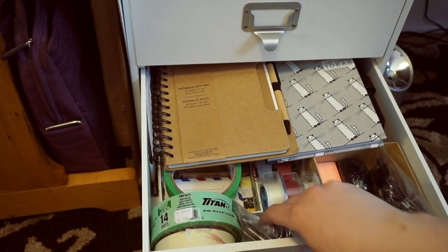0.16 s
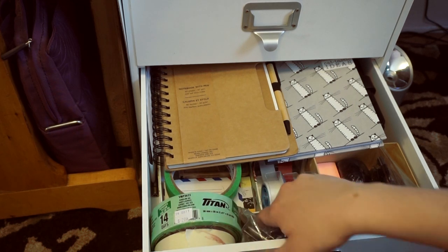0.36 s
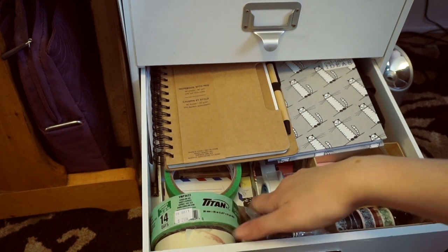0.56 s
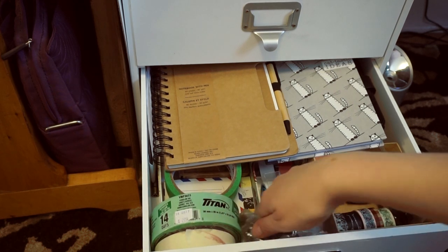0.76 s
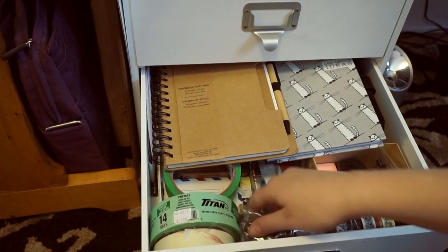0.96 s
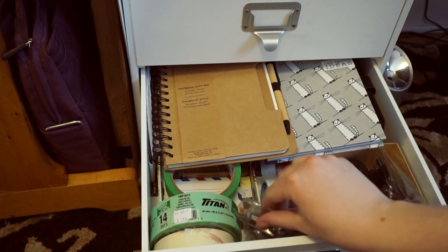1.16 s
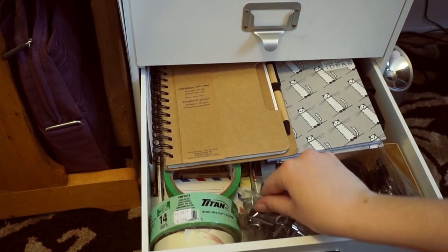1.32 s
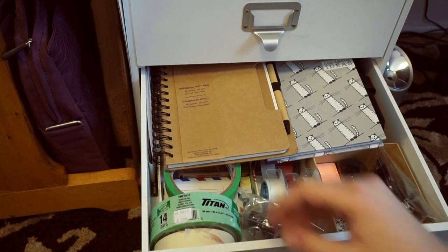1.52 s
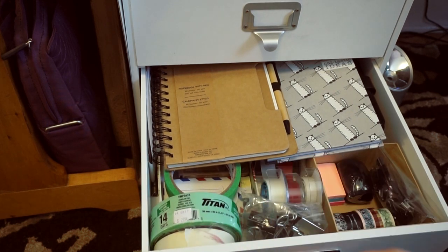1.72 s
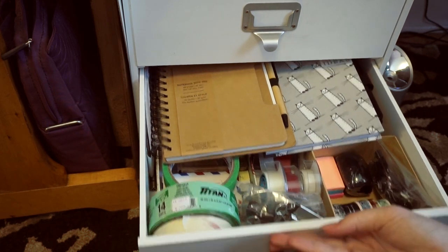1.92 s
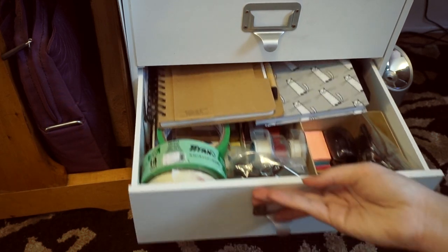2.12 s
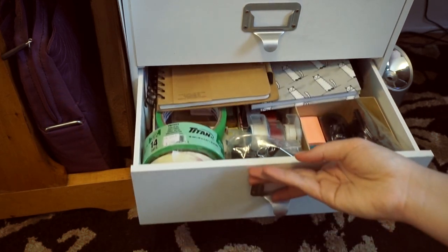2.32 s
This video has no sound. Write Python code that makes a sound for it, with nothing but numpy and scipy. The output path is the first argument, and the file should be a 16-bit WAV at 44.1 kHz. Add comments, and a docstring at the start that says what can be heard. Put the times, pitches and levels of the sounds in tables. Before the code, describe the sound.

Plastic wrapping crinkles and small items click in a drawer, which then rolls in and bumps.

```python
"""Stiff plastic wrapping snaps and crinkles as a hand rummages in an open desk drawer, close by in a
small room. Tape rolls and small boxes knock and rub against each other. Then the hand pushes the drawer
front: the drawer rolls on its runners, groans briefly and bumps, and its panels boom.
A faint, low background noise lies under it all."""
import sys
import numpy as np
from scipy import signal
from scipy.fft import rfft, irfft
from scipy.io import wavfile
from scipy.ndimage import uniform_filter1d

SR = 44100
rng = np.random.default_rng(int(sys.argv[2]) if len(sys.argv) > 2 else 0)


def dump_mix(stems):
    """Bounce the given channels to the path in sys.argv[1] as a 16-bit WAV at rate SR."""
    frames = np.atleast_2d(stems).T  # one column per channel
    limited = np.clip(frames, -1, 1)  # hard clip at full scale
    pcm = np.round(limited * 32767).astype(np.int16)
    wavfile.write(sys.argv[1], SR, pcm)


N = 104958

# how strong each pitch is in the drawer's deep rumble: pitch_hz, level_db
RUMBLE_TONE = [(30, -40), (75, -18), (105, -1.5), (180, 3), (250, -3.5), (340, 2.5), (450, -4.5),
               (700, -12), (1500, -63)]


def snaps():
    """Plastic snaps and hard things click: each is a short ring, a crack and a bright edge."""
    # one row per snap: start_s, level_db, pitch_hz, treble_db
    events = [(0.0046, -32, 1000, -63), (0.0213, -26.5, 1020, -33), (0.0476, -41, 2900, -52),
              (0.0618, -32.5, 2880, -53), (0.0715, -22.5, 4830, -31.5), (0.1552, -29.5, 4100, -29.5),
              (0.1665, -36.5, 2480, -42), (0.23, -35.5, 920, -70), (0.2444, -36, 5900, -40.5),
              (0.2599, -31.5, 2230, -45), (0.3017, -28, 1130, -39), (0.3118, -31, 4300, -35),
              (0.315, -29, 5440, -27), (0.34, -42, 3920, -27), (0.3471, -29.5, 1780, -34),
              (0.3747, -32.5, 1150, -36), (0.3981, -26.5, 4550, -29.5), (0.4105, -29.5, 2530, -28),
              (0.4374, -35.5, 2270, -37), (0.4487, -33, 2490, -35), (0.4655, -27.5, 2450, -43),
              (0.4819, -24, 2300, -57), (0.5158, -26, 3650, -37.5), (0.5854, -33, 1930, -52),
              (0.5979, -25, 3790, -34), (0.616, -28.5, 2200, -37), (0.6306, -25, 2940, -28),
              (0.7343, -35, 4800, -37), (0.7423, -32.5, 2800, -27.5), (0.7483, -29, 2300, -46),
              (0.7597, -37, 1600, -35), (0.7849, -27, 3280, -26), (0.7955, -42, 3240, -45),
              (0.8378, -34.5, 2340, -40.5), (0.8572, -30, 2320, -50), (0.8659, -30.5, 5500, -33.5),
              (0.8815, -26, 1110, -31.5), (0.9078, -24.5, 3270, -27.5), (0.924, -34.5, 2420, -33.5),
              (0.9389, -29, 1340, -37.5), (1.011, -41, 2010, -56), (1.0196, -35, 1990, -43),
              (1.0251, -31.5, 3300, -33.5), (1.0733, -35, 2240, -60), (1.0774, -29.5, 2370, -39.5),
              (1.1, -39, 6400, -34.5), (1.1118, -29.5, 2950, -34), (1.121, -28.5, 6150, -34.5),
              (1.171, -33, 4670, -38), (1.1892, -21, 3070, -27.5), (1.1922, -28, 3540, -32),
              (1.211, -38.5, 3240, -34), (1.236, -31, 2760, -35), (1.2842, -30, 4750, -29.5),
              (1.2911, -25.5, 1320, -29), (1.3154, -26.5, 3420, -47), (1.3195, -28, 3300, -41),
              (1.326, -29.5, 1800, -35), (1.3543, -39.5, 1740, -37.5), (1.3659, -32.5, 4970, -42),
              (1.3885, -41, 1330, -39), (1.411, -32, 890, -31.5), (1.4422, -26, 2450, -35.5),
              (1.4612, -27.5, 1350, -30), (1.478, -36, 2900, -38), (1.5007, -36, 2700, -49),
              (1.5087, -37, 1290, -61), (1.58, -32.5, 3800, -35.5), (1.627, -44.5, 2234, -52.5),
              (1.83, -55.5, 1006, -66), (1.8557, -50, 940, -59), (1.8872, -51.5, 2340, -63),
              (2.049, -34, 3500, -51.5)]
    # tone of the crack: pitch_hz, level_db
    crack_tone = [(150, -29.5), (400, -19.5), (1200, 0.5), (3000, 2.5), (4600, 3.5), (6000, -4.5),
                  (7500, -5), (12000, -60)]
    # tone of the bright edge: pitch_hz, level_db
    edge_tone = [(3000, -26), (6500, 4), (9000, 1.5), (14000, -1.5), (16000, -14)]
    out, t = np.zeros(N), np.arange(SR // 20) / SR
    rise_s, ring_share = 0.00081, 0.39
    rise = np.minimum(t / rise_s, 1)
    for start_s, level_db, pitch_hz, treble_db in events:
        note = unit(rise * ring(t, pitch_hz, cycles=16.6))
        crack = unit(rise * burst(t, crack_tone, fade_s=0.019))
        body = unit(np.sqrt(ring_share) * note + np.sqrt(1 - ring_share) * crack, size=176)
        edge = unit(rise * burst(t, edge_tone, fade_s=0.015), size=176)
        add(out, start_s, gain(level_db) * body + gain(treble_db) * edge)
    return out


def crinkle():
    """Tiny creases in the wrapping buckle at random: each is a dry crack with its own brief ring."""
    # how loud the crumpling is over time: time_s, level_db
    loudness = [(0, -48.5), (.09, -41), (.14, -54), (.17, -38), (.215, -64), (.295, -41), (.32, -34),
                (.39, -44.5), (.56, -46), (.62, -45), (.7, -43.5), (.75, -44), (.83, -54), (.93, -32.5),
                (.985, -51), (1.06, -54.5), (1.11, -35.5), (1.17, -45), (1.27, -46.5), (1.325, -46),
                (1.39, -49), (1.47, -36.5), (1.52, -53.5), (1.7, -77)]
    # tone of the wrapping: pitch_hz, level_db
    tone = [(200, -41.5), (600, 6.5), (1500, 0.5), (3000, 2.5), (8000, -3), (15500, -15.5)]
    out, t = np.zeros(N), np.arange(SR // 100) / SR
    creases_per_s, low_hz, high_hz = 520, 1180, 9000
    for when, softness, pitch in rng.random((int(creases_per_s * N / SR), 3)):
        crack = unit(rng.standard_normal(len(t)) * fade(t, fade_s=0.0047))
        note = unit(ring(t, low_hz * (high_hz / low_hz) ** pitch, cycles=7.7))
        strength = gain(-6 * np.log(softness + 0.025))  # many soft creases, a few loud ones
        add(out, when * N / SR, strength * (crack + 0.5 * note))
    return unit(colour(out, tone)) * curve(loudness)


def knocks():
    """Light hollow things bump together: each gives a short ring over a dull clack."""
    # one row per knock: start_s, level_db, pitch_hz
    events = [(0.0523, -37, 563), (0.0605, -32.5, 606), (0.132, -31, 916), (0.2604, -36, 452),
              (0.2858, -33.5, 1100), (0.427, -37, 368), (0.596, -32, 1120), (0.6997, -37.5, 394),
              (0.7457, -34.5, 1030), (0.8367, -42, 430), (0.873, -34, 1250), (0.8824, -29.5, 441),
              (0.9245, -32.5, 686), (1.025, -38, 389), (1.0775, -35.5, 370), (1.1524, -37.5, 425),
              (1.1889, -39.5, 1100), (1.2473, -39.5, 346), (1.3176, -32.5, 623), (1.4, -37, 445),
              (1.8047, -58, 980), (1.8572, -44.5, 344), (2.099, -33.5, 513)]
    # tone of the clack: pitch_hz, level_db
    tone = [(170, -35), (350, 1.5), (700, 2.5), (1300, -5.5), (2500, -11.5), (6000, -35.5)]
    out, t = np.zeros(N), np.arange(SR // 10) / SR
    rise_s, ring_share = 0.0014, 0.68
    rise = np.minimum(t / rise_s, 1)
    for start_s, level_db, pitch_hz in events:
        note = unit(ring(t, pitch_hz, cycles=12.8))
        clack = unit(burst(t, tone, fade_s=0.028))
        body = np.sqrt(ring_share) * note + np.sqrt(1 - ring_share) * clack
        add(out, start_s, gain(level_db) * unit(rise * body, size=265))
    return out


def contacts():
    """The snaps and knocks together, from things too light to make bass."""
    return low_cut(snaps() + knocks(), hz=180)


def rubbing():
    """Things catch and slip against each other as they slide under the hand."""
    # how loud the sliding is over time: time_s, level_db
    loudness = [(0, -41.5), (.21, -47.5), (.32, -37), (.4, -42.5), (.52, -48.5), (.62, -40.5), (.76, -40),
                (.83, -54.5), (.89, -42), (1.0, -49), (1.11, -39.5), (1.22, -44), (1.33, -41.5),
                (1.45, -42.5), (1.66, -67.5), (1.75, -99)]
    # tone of the sliding things: pitch_hz, level_db
    tone = [(40, -40), (110, -19), (220, -7.5), (340, 4), (450, 4), (750, -1.5), (1100, 2), (1700, -1.5),
            (3000, -3), (8000, -20)]
    return slips(tone) * curve(loudness)


def panel_booms():
    """Each jolt of the drawer makes a thud and sets its panels ringing."""
    # jolts on the runners: start_s, level_db, push_s
    jolts = [(2.039, -38, 0.0049), (2.055, -37.5, 0.012), (2.100, -43, 0.00076), (2.1968, -24, 0.00065),
             (2.215, -29.5, 0.0042), (2.223, -26.5, 0.0035), (2.242, -40, 0.0042)]
    # the notes the panels ring at: pitch_hz, level_db, fade_s
    notes = [(108.6, 2, 0.11), (148.6, -4.5, 0.19), (199, -3, 0.076), (319, -1, 0.31), (358.5, 6.5, 0.12),
             (445, -9, 0.15), (527, -15, 0.13), (774, -13, .1), (1170, -10, .08)]
    out, t = np.zeros(N), np.arange(SR // 2) / SR
    panels = unit(sum(gain(db) * np.sin(2 * np.pi * hz * t) * fade(t, fade_s) for hz, db, fade_s in notes))
    for start_s, level_db, push_s in jolts:
        thud = gain(-7) * unit(burst(t, RUMBLE_TONE, fade_s=0.059))
        push = t * np.exp(-2 * np.pi * t / push_s)  # a longer push sounds duller
        boom = signal.fftconvolve(panels + thud, push)[:len(t)]
        add(out, start_s, gain(level_db) * unit(boom, size=882))
    return out


def drawer():
    """The drawer rolls in: rollers rumble, panels boom, and the metal runners hiss and faintly sing."""
    # how loud the rolling is over time: time_s, rumble_db, hiss_db
    loudness = [(1.79, -94.5, -80), (1.83, -67, -69), (1.868, -59, -58), (1.92, -57, -61),
                (1.99, -57.5, -54), (2.04, -45.5, -49), (2.11, -40, -44.5), (2.18, -49, -48),
                (2.205, -37, -37), (2.25, -36, -48.5), (2.3, -51, -52.5), (2.38, -57, -55)]
    # tone of the runners' hiss: pitch_hz, level_db
    hiss_tone = [(250, -12.5), (600, 3.5), (1150, 4), (1700, -5.5), (2400, -3), (2900, -9.5), (3600, -6.5),
                 (7000, -14.5), (13000, -24), (16000, -41)]
    body = panel_booms() + slips(RUMBLE_TONE) * curve(loudness)
    metal_note = ring(np.arange(SR // 2) / SR, pitch_hz=2880, cycles=50)
    singing = unit(signal.fftconvolve(rng.standard_normal(N), metal_note)[:N])
    hiss = unit(slips(hiss_tone) + unit(colour(rng.standard_normal(N), hiss_tone)))
    runners = (hiss + gain(-9.5) * singing) * curve(loudness, column=2)
    return low_cut(body, hz=92) + runners


def groan():
    """A runner sticks and slips for a moment, making a rough low note that falls in pitch."""
    peak_s, width_s, pitch_hz, fall_hz_per_s = 2.048, 0.035, 176, 250
    t = np.arange(N) / SR - peak_s
    phase = 2 * np.pi * np.cumsum(pitch_hz - fall_hz_per_s * t) / SR
    roughness = 1 + 0.37 * unit(uniform_filter1d(rng.standard_normal(N), size=400))
    swell = np.exp(-(t / width_s) ** 2)
    return gain(-43) * unit(np.sin(phase)) * roughness * swell


def room(x):
    """Sound bounces around the small room and comes back as a short, smooth tail."""
    # the tail from bass to treble, next to the direct sound: pitch_hz, level_db, fade_s
    bands = [(101.3, -34, 0.34), (392, -8, 0.21), (1200, -8, 0.32), (2400, -6, 0.11), (4300, -9, 0.23),
             (8850, -8, 0.17), (15130, -5.5, 0.12)]
    t, rise_s = np.arange(SR // 2) / SR, 0.0087
    noise = rfft(rng.standard_normal(len(t)))
    log_hz = np.log(np.fft.rfftfreq(len(t), 1 / SR) + 1)
    log_centres = np.log([row[0] for row in bands])
    tail = np.zeros(len(t))
    for this_band, (_, level_db, fade_s) in zip(np.eye(len(bands)), bands):
        band = irfft(noise * np.interp(log_hz, log_centres, this_band), len(t))
        shape = fade(t, fade_s) * np.minimum(t / rise_s, 1)
        tail += gain(level_db) * band * shape / np.linalg.norm(shape)
    return signal.fftconvolve(x, tail)[:N]


def background():
    """A faint, low, steady noise fills the room."""
    # tone of the quiet room: pitch_hz, level_db
    tone = [(25, -1.5), (200, -5.5), (330, 9), (600, -3), (1500, -18), (15000, -22)]
    return gain(-68) * unit(colour(rng.standard_normal(N), tone))


def slips(tone, per_s=900, spread_db=3):
    """Sliding surfaces catch and let go, making a stream of tiny uneven ticks."""
    ticks = (rng.random(N) < per_s / SR) * rng.choice([-1, 1], N)
    strength = gain(spread_db * np.clip(rng.standard_normal(N), -2, 2))
    return unit(colour(ticks * strength, tone))


def ring(t, pitch_hz, cycles):
    """A pure note that dies away in the given number of vibrations."""
    return np.sin(2 * np.pi * pitch_hz * t) * fade(t, cycles / pitch_hz)


def burst(t, tone, fade_s):
    """A puff of noise with the given tone, dying away."""
    return colour(rng.standard_normal(len(t)) * fade(t, fade_s), tone)


def fade(t, fade_s):
    """A smooth fall that drops 60 dB in fade_s seconds."""
    return np.exp(-np.log(1000) * t / fade_s)


def colour(x, tone):
    """Make some pitches louder and others softer, following rows of pitch_hz, level_db."""
    hz, db = np.array(tone).T
    size = 4096
    log_hz = np.log(np.arange(size // 2 + 1) * SR / size + 1)
    gains = gain(np.interp(log_hz, np.log(hz), db))
    # build the filter so that it never sounds before its input does
    cepstrum = irfft(np.log(gains))
    cepstrum[1:size // 2] *= 2
    cepstrum[size // 2 + 1:] = 0
    response = irfft(np.exp(rfft(cepstrum)))[:size // 2]
    return signal.fftconvolve(x, response)[:len(x)]


def low_cut(x, hz):
    """Take away the bass below hz."""
    return signal.sosfilt(signal.butter(4, hz, "high", fs=SR, output="sos"), x)


def curve(table, column=1):
    """A volume that glides between a table's levels over time."""
    rows = np.array(table)
    return gain(np.interp(np.arange(N) / SR, rows[:, 0], rows[:, column]))


def gain(db):
    """Turn decibels into a number to multiply by."""
    return 10 ** (np.asarray(db) / 20)


def unit(x, size=None):
    """Scale a sound so its average strength (rms) is 1, overall or in its first size samples."""
    return x / np.sqrt(np.mean(x[:size] ** 2) + 1e-18)


def add(out, start_s, sound):
    """Mix a sound in at its start time."""
    i = int(np.clip(start_s * SR, 0, N - 1))
    out[i:i + len(sound)] += sound[:N - i]


def scene():
    """Rummaging with one quick echo, then the drawer rolling in, in a quiet room."""
    rustle = crinkle() + rubbing()
    rummage = contacts() + rustle
    # each contact sends a different crack in each direction; blending five makes the tail even
    contact_tail = sum(room(contacts()) for _ in range(5)) / np.sqrt(5)
    echoes = contact_tail + room(rustle)
    add(echoes, start_s=0.0101, sound=gain(-17) * rummage)
    closing = drawer() + groan()
    return (rummage + echoes + closing + gain(-5.5) * room(closing) + background())[None]


def record(dry):
    """Take away the very highest treble."""
    top_hz = 16100
    return signal.sosfilt(signal.ellip(10, .2, 70, top_hz, fs=SR, output="sos"), dry)


dry = scene()
out = record(dry)
dump_mix(out)
```